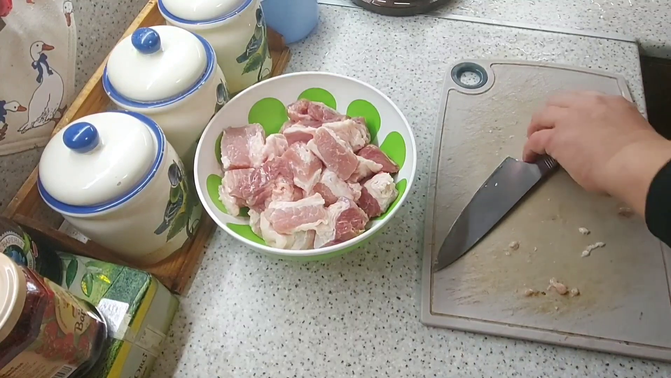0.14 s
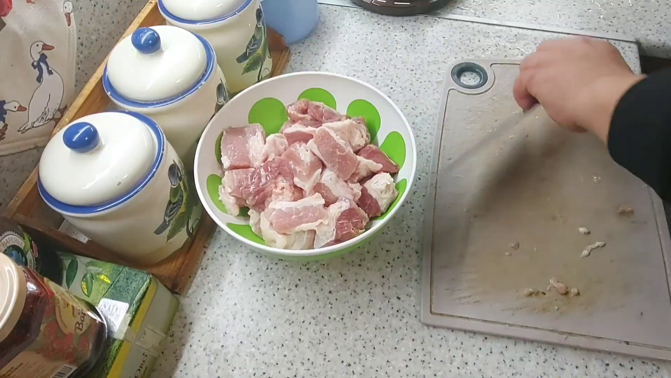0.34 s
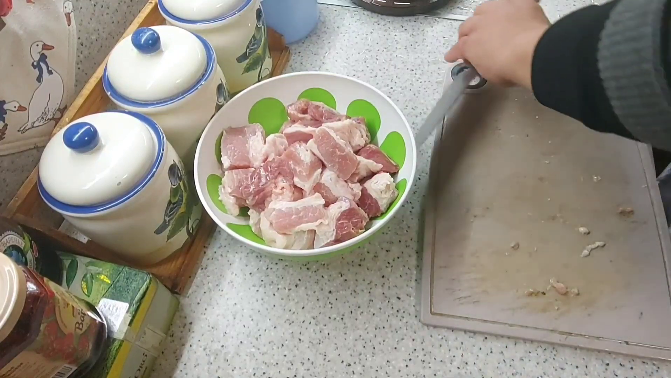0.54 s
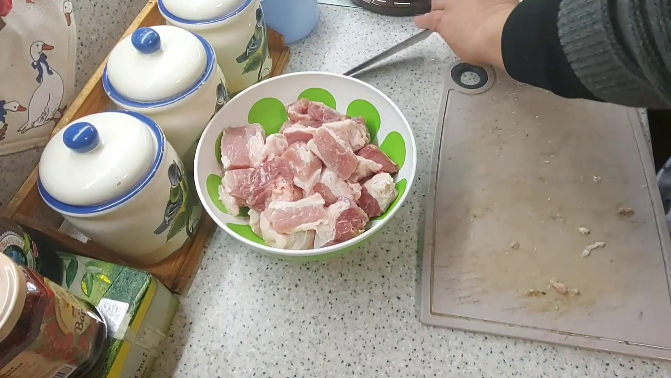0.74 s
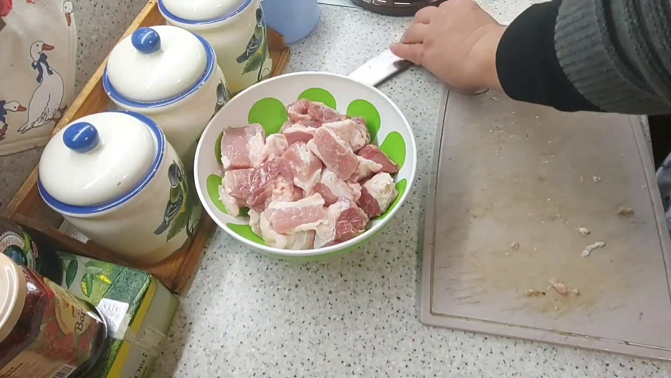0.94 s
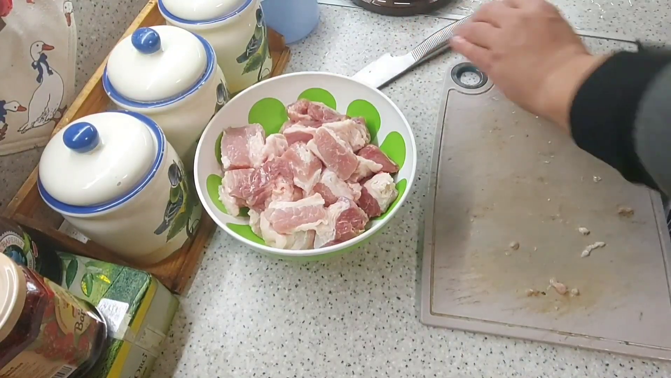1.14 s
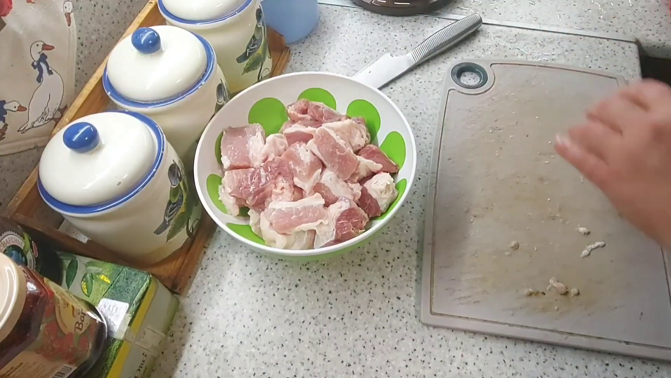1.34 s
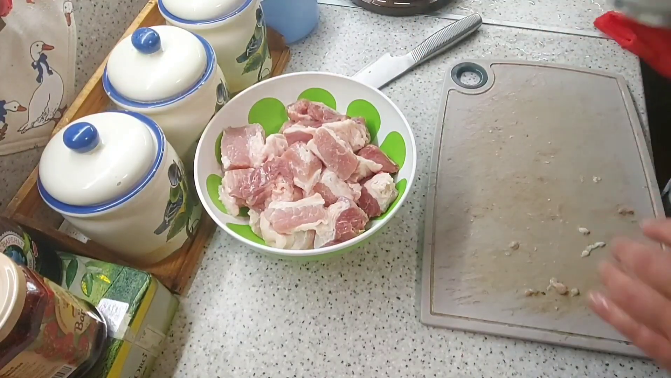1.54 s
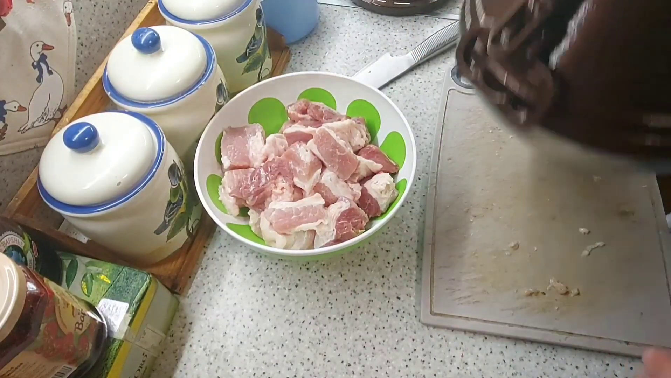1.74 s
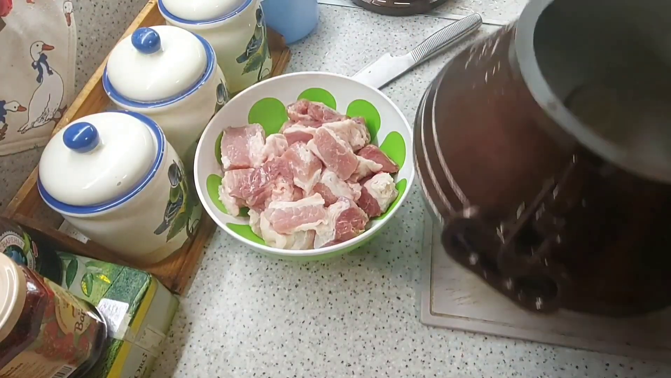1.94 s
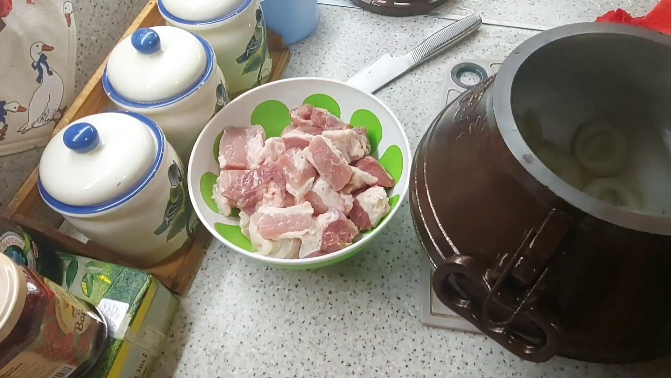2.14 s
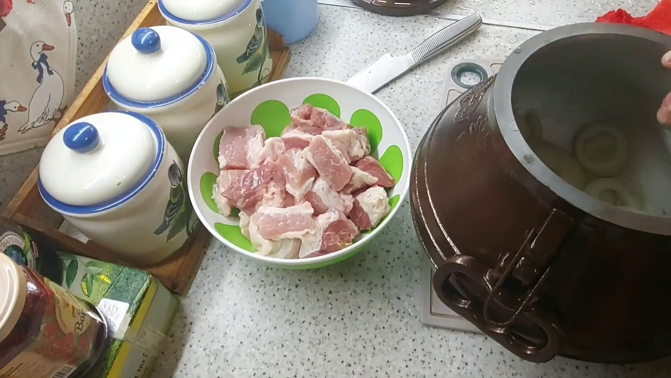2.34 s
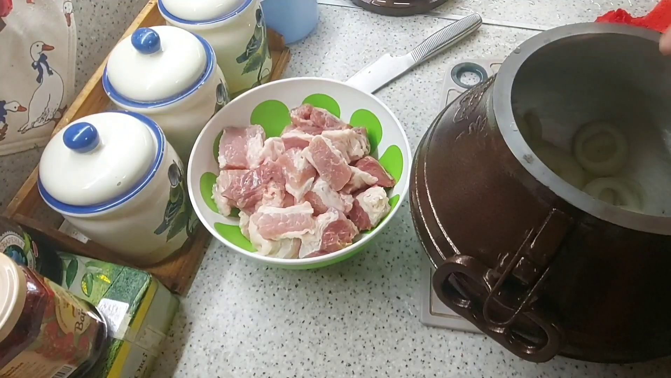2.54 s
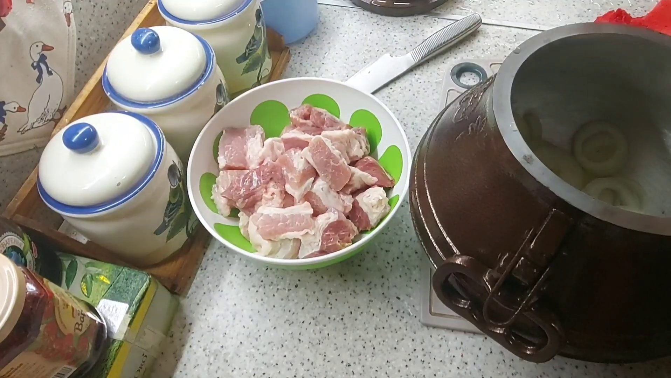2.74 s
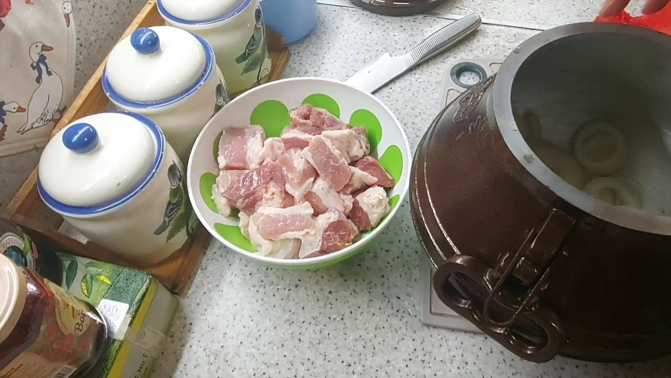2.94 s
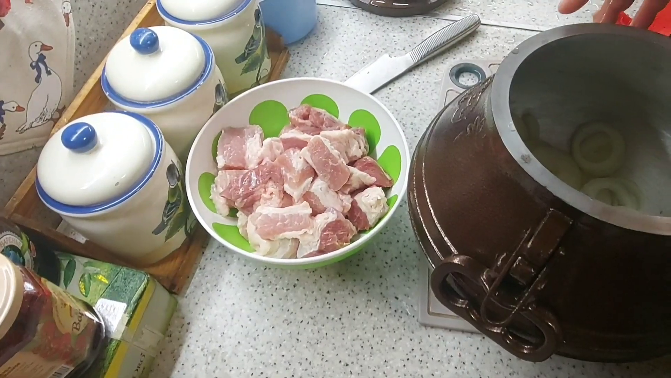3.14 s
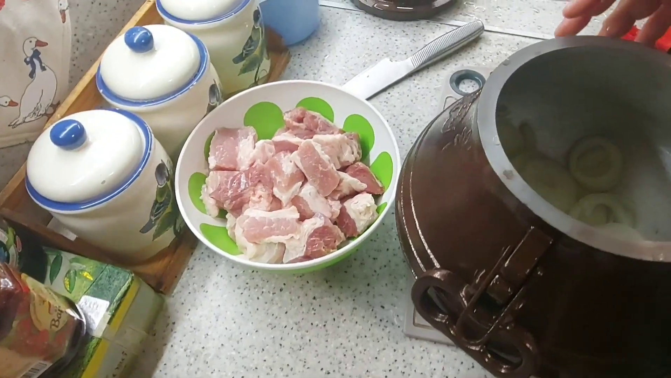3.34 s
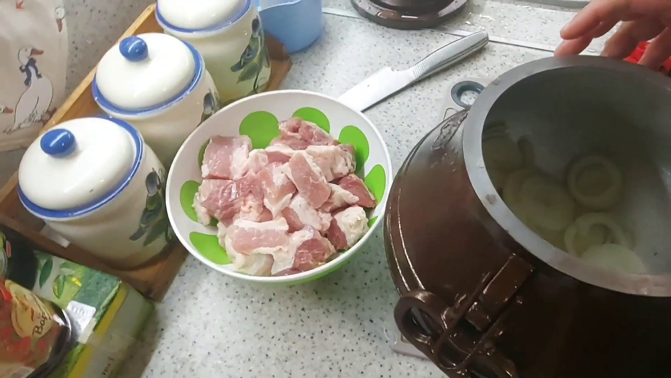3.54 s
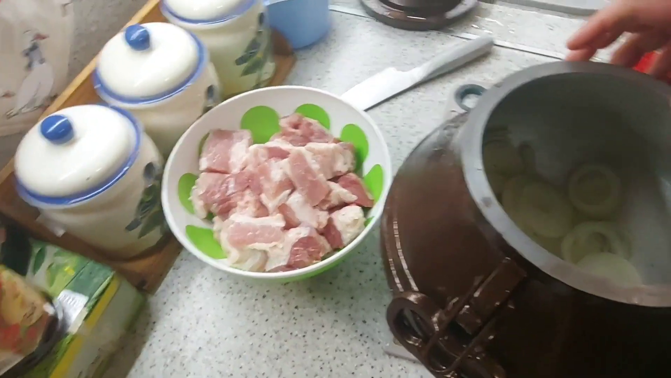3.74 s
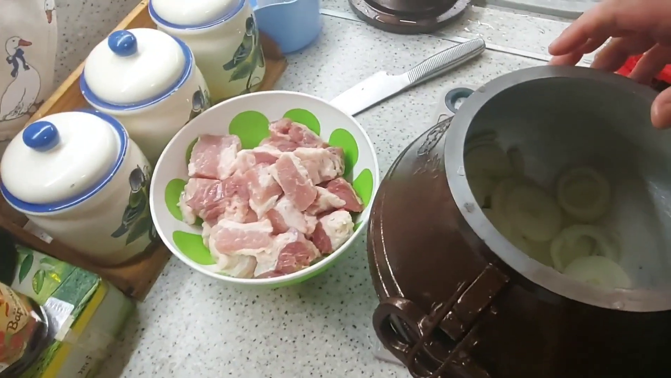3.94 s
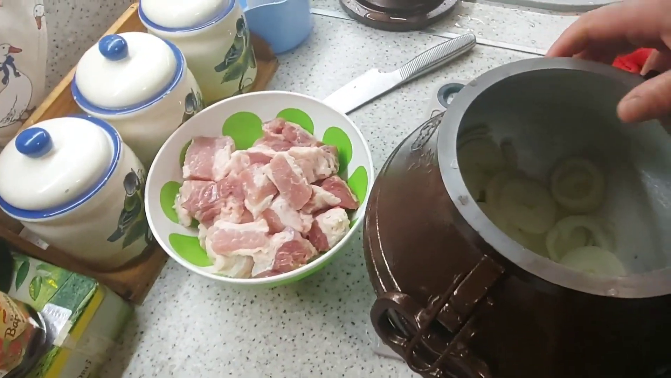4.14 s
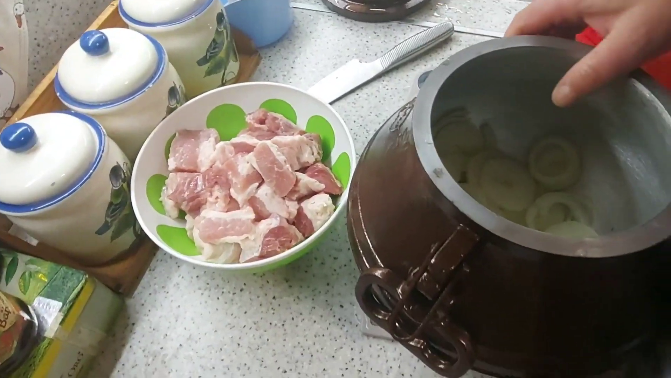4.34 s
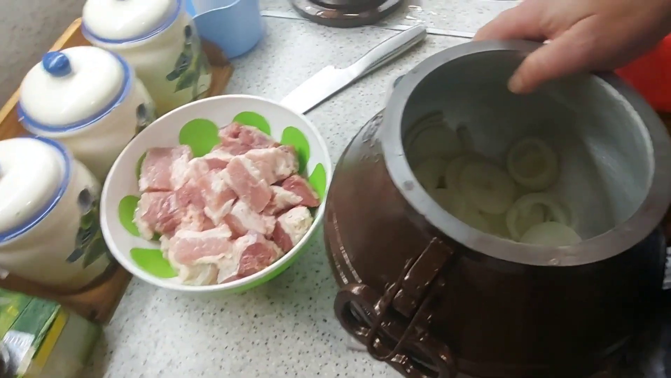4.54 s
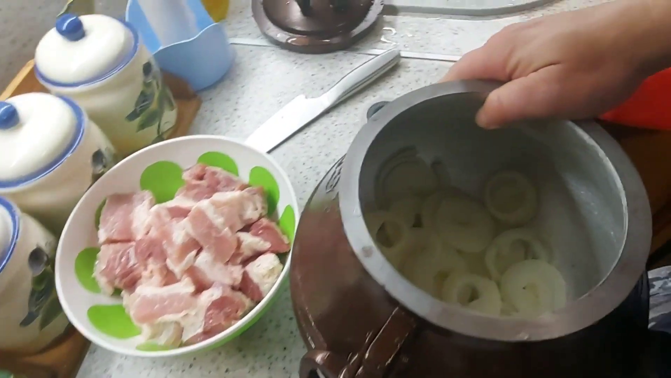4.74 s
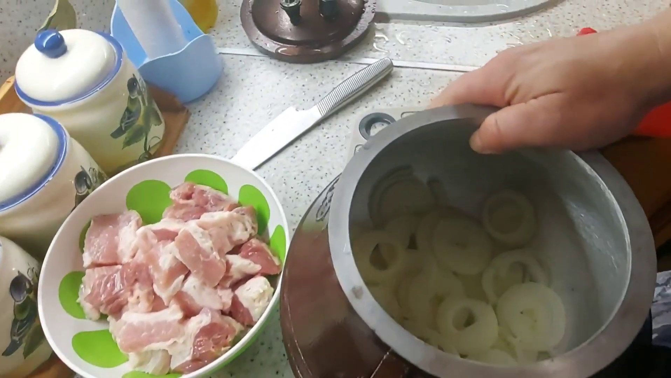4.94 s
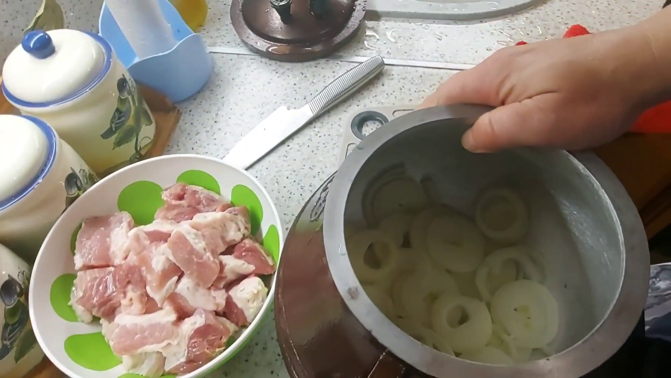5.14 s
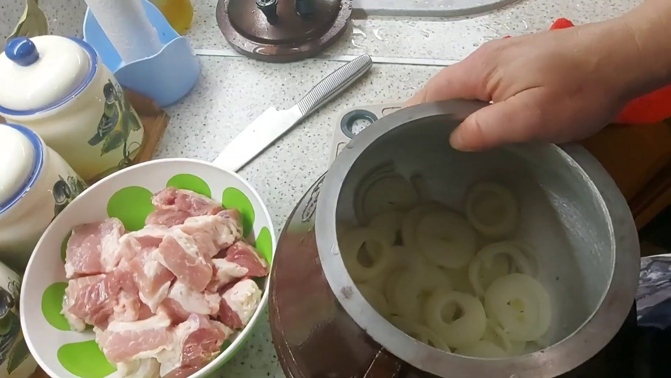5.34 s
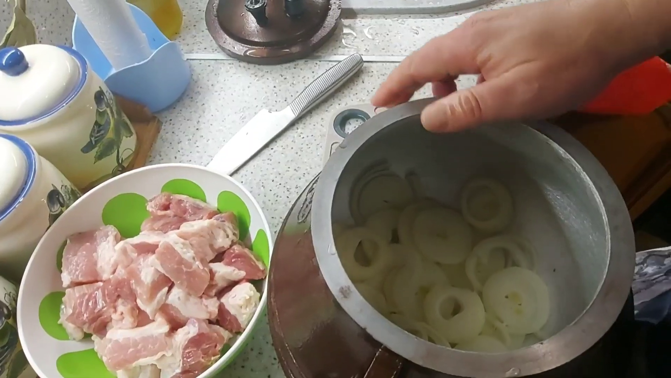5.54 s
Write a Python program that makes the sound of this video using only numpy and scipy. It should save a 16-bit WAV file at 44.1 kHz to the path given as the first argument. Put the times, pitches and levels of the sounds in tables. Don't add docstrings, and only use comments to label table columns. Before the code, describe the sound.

A knife clatters, scrapes and rings on a kitchen worktop, then a heavy pot thuds down, followed by latch clicks and light rim taps.

```python
import sys
import numpy as np
from scipy import signal
from scipy.fft import rfft, irfft
from scipy.io import wavfile
from scipy.ndimage import uniform_filter1d

SR = 44100
rng = np.random.default_rng(int(sys.argv[2]) if len(sys.argv) > 2 else 0)


def store_wav(level_fs):
    pcm = np.round(np.clip(np.atleast_2d(level_fs), -1, 1) * 32767)
    wavfile.write(sys.argv[1], SR, pcm.T.astype(np.int16))


def magnitude_from_level(level_db):
    exponent = np.asarray(level_db, float) / 20
    return 10 ** exponent


N = 250664
T = np.arange(N) / SR
KNIFE_METAL_DB = 21.5
STOP_S = 0.0052

# centre in Hz, width in Hz, level in dB.
BLADE_MODES = [(2260, 50, -15.5), (2575, 16, -18.5), (2640, 10, -19.5), (3236, 41, -8.5), (3435, 3.7, -13),
               (4580, 33, -9), (4805, 6, -7), (5280, 90, -12.5), (5704, 22, -7.5), (5983, 30, -12.5),
               (6290, 70, -10.5), (6780, 29, -10.5), (7450, 25, -10), (8700, 32, -7.5), (9200, 45, -11),
               (9980, 40, -11.5), (10340, 45, -11.5), (11470, 80, -11.5), (12060, 35, -11), (11440, 35, -7),
               (12030, 23, -11), (12860, 33, -8.5), (14060, 32, -15), (13570, 35, -12.5), (15450, 31, -13)]
WORKTOP_MODES = [(150, 32, -7.5), (241.2, 43, 3.5), (250, 27, -10.5), (377, 52, 1.5), (465, 5.8, 4.5),
                 (510, 4, -2.5), (612, 11, -18.5), (760, 15, -11.5), (850, 22, 3.5), (930, 16, -14),
                 (936, 23, -10), (1260, 88, -13.5), (1290, 51, -16)]
POT_MODES = [(156, 9.7, 16.5), (199.6, 17, 22), (271, 53, 3.5), (376, 70, 13.5), (349, 83, 15.5),
             (450, 58, 1), (449, 96, 18), (557, 110, 14.5), (693, 100, 12), (810, 63, 19), (920, 21, 12.5)]
LATCH_MODES = [(1750, 590, -9), (3100, 140, -7.5), (4307, 130, -1), (6445, 620, -0.5), (7500, 1100, -4),
               (9560, 280, -7), (10430, 220, -1), (12960, 230, -25.5), (14310, 250, -20)]


def unit(x):
    return x / np.sqrt(np.mean(x ** 2) + 1e-30)


def peak(x, db):
    return x * magnitude_from_level(db) / np.max(np.abs(x))


def decay(t, t60):
    return np.exp(-np.log(1000) * t / t60)


def band(x, lo_hz, hi_hz):
    sos = signal.butter(2, [lo_hz, min(hi_hz, .45 * SR)], "bandpass", fs=SR, output="sos")
    return signal.sosfilt(sos, x)


def walk(rate, n=N):
    k = int(SR / rate)
    held = np.repeat(rng.standard_normal(n // k + 1), k)
    return uniform_filter1d(uniform_filter1d(held, k), k)[:n]


def grit(n, scatter_db):
    grain = np.repeat(rng.exponential(size=n // 24 + 1), 24)[:n]
    return unit(rng.standard_normal(n) * magnitude_from_level(scatter_db * grain))


def ports(mid, diff, side):
    return mid + side * diff * np.array([[1], [-1]])


def add(out, x, s, pan_db):
    i = int(s * SR)
    pan = magnitude_from_level(np.array([[pan_db], [-pan_db]]) / 2)
    out[:, i:i + x.shape[-1]] += pan * x[..., :N - i]


def ring(x, modes, scatter_db, drift=0):
    luck = rng.standard_normal((len(modes), 2))
    out = 0
    for (hz, width, db), (spot, detune) in zip(modes, luck):
        r = np.exp(-np.pi * abs(width) / SR)
        turn = 2 * np.pi * hz * (1 + .0015 * detune) / SR
        share = walk(drift, x.shape[-1]) if drift else spot
        drive = x * magnitude_from_level(scatter_db * share)
        mode = signal.lfilter([1, 0, -1], [1, -2 * r * np.cos(turn), r * r], drive)
        out = out + magnitude_from_level(db) * (1 - r) * mode
    return out


def hits(table, body, metal, metal_db, scatter_db, blow, push_s, rise_s, split_hz, top_hz, pan_db):
    out, t = np.zeros((2, N)), T[:SR // 5]
    end = np.cos(np.pi / 2 * t / t[-1])
    for s, crack_db, knock_db, sizzle_db, t60 in table:
        fade = decay(t, max(t60, .005)) * np.minimum(t / rise_s, 1) ** 2
        scuff = ports(grit(len(t), 2.2), grit(len(t), 2.2), 1.0) * fade
        push = blow * np.sin(np.pi * np.minimum(t / push_s, 1))
        push = push + 0.39 * ports(scuff.mean(axis=0), scuff[0] - scuff[1], 0.1)
        bright = scuff + magnitude_from_level(metal_db) * ring(scuff, metal, scatter_db)
        lags = rng.integers(4, 30, size=2)
        bright += 0.41 * np.array([np.roll(b, k) for b, k in zip(bright, lags)])
        knock = band(ring(push, body, 3) + magnitude_from_level(-7.5) * push, 150, 1200)
        knock += ports(0, band(np.roll(knock[0], 40), 560, 1900), 0.85)
        crack = band(bright, 1100, split_hz)
        sizzle = band(band(bright, split_hz, top_hz), split_hz / 2, top_hz)
        start = s - rise_s / 2
        add(out, end * peak(knock, knock_db + 5.5), start, pan_db * 0.32)
        add(out, end * (peak(crack, crack_db + 7.0) + peak(sizzle, sizzle_db + 8)), start, pan_db)
    return out


def knife_knocks():
    # time in seconds, crack, knock and sizzle peaks in dB, scuff t60 in seconds.
    knocks = [(.4226, -36.5, -47, -31, 0.091), (.4983, -24.5, -31.5, -23.5, 0.15),
              (.5287, -28, -35, -27.5, 0.093), (.6991, -24, -19.5, -25.5, 0.077),
              (.7961, -23, -18, -23, 0.052), (.8223, -30.5, -22.5, -48, 0.091),
              (.8548, -27, -29, -30, 0.53), (.8719, -33, -22, -27.5, 0.13), (.8863, -25, -20, -35.5, 0.087),
              (.9006, -25.5, -28.5, -34.5, 0.23), (.9695, -21.5, -16, -30, 0.12),
              (.9959, -16, -13, -25, 0.031), (1.0500, -16, -16, -22.5, 0.055)]
    return hits(knocks, WORKTOP_MODES, BLADE_MODES, KNIFE_METAL_DB, scatter_db=-4.5, blow=0.3,
                push_s=0.00045, rise_s=0.0019, split_hz=5240, top_hz=17000, pan_db=2)


def knife_slips():
    # time in seconds, crack, knock and sizzle peaks in dB, scuff t60 in seconds.
    glances = [(.5095, -42, -37.5, -29, 0.044), (.5548, -24.5, -38, -27.5, 0.16),
               (.575, -26, -38, -32, 0.19), (.598, -34, -41, -36, 0.054), (.683, -38.5, -37.5, -36, 0.11),
               (.9847, -26.5, -19, -17, 0.3), (1.0039, -20, -35, -22.5, 0.056),
               (1.0579, -19.5, -12.5, -17.5, 0.081), (1.0664, -25.5, -49, -30, 0.022),
               (1.0964, -28.5, -19, -34, 0.1), (1.1144, -27, -24.5, -42, 0.27),
               (1.126, -34.5, -28, -42.5, 0.03), (1.1701, -26, -22, -38, 1),
               (1.21, -26, -25.5, -16.5, 0.07), (1.2506, -23, -20.5, -17, 0.16),
               (1.2895, -23, -28, -24, 0.04), (1.3238, -32, -38.5, -26.5, 0.051),
               (1.4103, -43.5, -52.5, -39.5, 0.098)]
    return hits(glances, WORKTOP_MODES, BLADE_MODES, KNIFE_METAL_DB, scatter_db=5.5, blow=0,
                push_s=1, rise_s=.009, split_hz=4020, top_hz=16100, pan_db=2.0)


def slide():
    # start and length in seconds, pressure in dB, sag over the stroke in dB, share of rumble in dB.
    strokes = [
        (0.43, 0.037, -40.5, -8.5, -11),
        (0.491, 0.18, -30.5, -24, -20),
        (0.708, 0.07, -41.5, -8, -13),
        (0.832, 0.11, -42, 6.5, 1.5),
        (0.998, 0.12, -24.5, -17, -2),
        (1.15, .3, -33.5, -9.5, 5.5),
    ]
    rise_s, lift_s = .02, .05
    first = strokes[0][0]
    t = T[int(first * SR):int(first * SR) + 6 * SR // 5]
    n = len(t)
    hiss = rumble = 0
    for s, length, db, sag_db, rumble_db in strokes:
        lift = np.clip(1 - (t - s - length) / lift_s, 0, 1) ** 2
        touch = np.clip((t - s) / rise_s, 0, 1) * lift
        pressure_db = db + sag_db * (t - s) / length
        hiss = hiss + touch * magnitude_from_level(pressure_db)
        rumble = rumble + touch * magnitude_from_level(pressure_db + rumble_db)
    fine = ports(grit(n, 0.81), grit(n, 1.5), 0.61) * magnitude_from_level(3.1 * walk(90, n))
    steel = fine + magnitude_from_level(KNIFE_METAL_DB) * ring(fine, BLADE_MODES, 6.0, drift=14)
    steel = unit(band(steel, 1500, 18000))
    slips = (rng.random(n) < 500 / SR) * magnitude_from_level(3.0 * rng.exponential(size=n))
    slips = slips + 0.0073 * fine
    laminate = unit(band(ring(slips, WORKTOP_MODES, 2.0, drift=12), 160, 800))
    out = np.zeros((2, N))
    add(out, steel * hiss + laminate * rumble, first, 1.5)
    return out


def nulls(x):
    # centre in Hz, width in Hz.
    notches = [(3250, 150), (3850, 130), (4250, 130), (5130, 160), (6180, 180), (6620, 160), (7050, 160),
               (7600, 330), (8150, 250), (9580, 350), (10800, 250), (12450, 300), (14700, 400)]
    n = int(1.7 * SR)
    knife = x[:, :n]
    for hz, width in notches:
        b, a = signal.iirpeak(hz, hz / width, SR)
        depth = np.clip(1.05 + .4 * walk(7, n), 0, 1)
        knife = knife - depth * signal.lfilter(b, a, knife)
    return np.hstack([knife, x[:, n:]])


def tilt(x, count=8):
    from_s, to_s, width_hz = 1.205, 1.315, 600
    a0, a1 = int((from_s - .05) * SR), int((to_s + .05) * SR)
    part = x[:, a0:a1]
    place = (T[a0:a1] - from_s) / (to_s - from_s) * count
    for k, hz in enumerate(np.linspace(3750, 4550, count + 1)):
        depth = np.clip(2 - np.abs(place - k), 0, 1)
        part = part - depth * signal.lfilter(*signal.iirpeak(hz, hz / width_hz, SR), part)
    return np.hstack([x[:, :a0], part, x[:, a1:]])


def taps():
    # time in seconds, pitch in Hz, peak in dB, t60 in seconds.
    blows = [
        (.9678, 730, -5, .028),
        (.9678, 1450, -15, .015),
        (1.0483, 520, -9, .03),
        (.9925, 520, -14, .03),
        (.5043, 300, -30, .06),
        (2.81, 420, -41, .05),
        (2.829, 330, -36, .09),
        (3.2545, 1500, -43, .02),
        (5.022, 345, -33, .08),
        (5.022, 1550, -45, .04),
    ]
    out, t = np.zeros((2, N)), T[:SR // 5]
    for s, hz, db, t60 in blows:
        add(out, -magnitude_from_level(db) * np.sin(2 * np.pi * hz * t) * decay(t, max(t60, .005)), s, 2.5)
    return out


def bounces():
    # time in seconds, peak in dB.
    contacts = [
        (0.424, -36),
        (0.498, -30.5),
        (.529, -26),
        (.553, -30.5),
        (0.572, -33.5),
    ]
    # pitch in Hz, level in dB.
    board = [(1030, 0.5), (1560, -2), (2200, -23), (2850, -7)]
    out, t = np.zeros((2, N)), T[:SR // 10]
    fade = np.minimum(t / 0.0019, 1) * decay(t, 0.052)
    for s, db in contacts:
        tone = 0
        for hz, mode_db in board:
            level = magnitude_from_level(mode_db + 2 * rng.standard_normal())
            tone = tone + level * np.sin(2 * np.pi * hz * t + rng.random((2, 1)))
        add(out, magnitude_from_level(db) * tone * fade, s, 2.5)
    return out


def notes():
    # time in seconds, pitch in Hz, peak in dB, t60 and free time in s.
    held_notes = [(0.44, 2650, -50.5, 1.7, .058), (.435, 850, -48.5, 0.83, 0.065),
                  (.53, 6378, -37, 0.15, 0.022), (.53, 4500, -36, 0.44, 0.05), (.53, 3750, -27, 0.08, .02),
                  (0.61, 4820, -47.5, 0.32, .08), (0.61, 6710, -52.5, 0.5, .08),
                  (.62, 760, -50.5, 0.8, .07), (.62, 1375, -49, .6, 0.089),
                  (0.698, 11250, -39.5, 0.41, 0.082), (.705, 2720, -49, 1.8, .09),
                  (.70, 2540, -40.5, .5, 0.1), (.80, 2640, -39, 0.82, .08), (.82, 3435, -38, .6, .065),
                  (.80, 12030, -37.5, .2, .08), (0.889, 1399, -30.5, 2.5, 0.087),
                  (.885, 1684, -33, 0.4, .07), (.89, 2710, -38.5, .4, 0.068),
                  (.89, 2890, -33.5, 0.18, 0.045), (0.996, 5704, -18.5, 0.28, 0.044),
                  (0.996, 3435, -19, 0.12, 0.03), (.996, 5870, -28, 0.36, 0.048),
                  (1.0, 5983, -34.5, .5, .1), (1.0, 9900, -31, 0.27, 0.068), (1.03, 6950, -41.5, .5, .06),
                  (1.055, 11710, -32, 0.25, 0.21), (1.055, 11900, -36, .25, .06),
                  (1.069, 4805, -37.5, 0.5, .047), (1.21, 8700, -34.5, 0.4, 0.061),
                  (1.24, 4730, -33, .4, 0.049), (1.215, 5550, -32, .4, 0.047),
                  (1.235, 6797, -44, 0.45, 0.041), (1.24, 12030, -48, .3, .06),
                  (1.31, 11930, -38.5, 0.36, .08), (1.35, 4760, -43.5, 0.75, 0.13),
                  (1.697, 916, -61.5, 0.34, 0.079), (1.77, 1398, -70, 1.0, .06),
                  (2.068, 1990, -48, 0.33, .035), (4.22, 1990, -50, 0.36, 0.048)]
    # time in seconds, pitch in Hz, peak in dB, t60 in seconds.
    pings = [(0.422, 2720, -46, .04), (.531, 5190, -34, 0.038), (.557, 2210, -37, 0.055),
             (.699, 2340, -29.5, 0.026), (.7965, 2180, -22.5, 0.021), (.823, 1380, -32, 0.089),
             (0.97, 1266, -15.5, 0.055), (.9685, 2020, -20, 0.013), (0.995, 2930, -20, 0.034),
             (1.05, 1070, -28, .1), (1.191, 5730, -44, .07), (1.697, 1900, -64.5, 0.061),
             (1.822, 896, -66, .1), (1.9894, 3050, -36, 0.029), (2.115, 3120, -44, 0.04),
             (2.826, 827, -43, 0.06), (3.552, 10420, -24.5, .03), (4.219, 3880, -59, 0.2),
             (4.219, 4700, -51, 0.072), (4.217, 5950, -44.5, 0.084), (4.219, 3050, -46.5, 0.083),
             (4.40, 2070, -47, .04), (4.406, 5950, -32, 0.038), (4.407, 4280, -31.5, 0.033),
             (4.415, 3765, -40, 0.052), (1.993, 295.5, -38, 0.34), (2.023, 411, -34, 0.16),
             (2.149, 170, -23, 0.05), (4.084, 12600, -53.5, 0.017), (4.086, 11300, -61, .02),
             (0.9712, 467, -13.5, 0.055), (.70, 699, -27, 0.04), (5.031, 249, -39, 0.15),
             (2.024, 798, -34, 0.053), (3.545, 957, -24, 0.05), (5.024, 592, -36.5, 0.11),
             (1.112, 477, -15.5, 0.063), (.508, 258.3, -37, 0.25), (4.566, 1700, -40, .03),
             (4.766, 3050, -42.5, 0.046), (4.767, 3630, -47, 0.05)]
    out, t = np.zeros((2, N)), T[:SR // 4]
    rows = list(held_notes) + [(*ping, 1) for ping in pings]
    for (s, hz, db, t60, free), (step, wobble) in zip(rows, rng.random((len(rows), 2))):
        stopped = np.exp(-np.maximum(t - free, 0) / STOP_S)
        fade = decay(t, max(t60, .02)) * stopped * np.minimum(t / 0.00062, 1)
        phase = 1.1 * min(hz / 900, 1) * step * np.array([[1], [-1]])
        waver = 1 + 0.23 * np.sin(2 * np.pi * (30 + 40 * wobble) * t)
        add(out, magnitude_from_level(db) * fade * np.sin(2 * np.pi * hz * t + phase) * waver, s, 2.0)
    return out


def thumps():
    # time in seconds, peak in dB, free time in seconds.
    booms = [(0.425, -46.5, 0.065), (0.499, -42.5, 0.052), (0.556, -40, .2), (0.699, -42, 0.12),
             (0.788, -39, 0.22), (0.966, -22, .1), (1.047, -23, .15), (2.02, -15.5, 0.14),
             (2.148, -17, 0.045), (2.261, -42, 0.052), (2.821, -46, 0.11), (3.251, -50, 0.11),
             (3.537, -38.5, 0.12), (3.666, -39.5, 0.084), (4.11, -47, .15)]
    # pitch in Hz, level in dB.
    cabinet = [(78, 0), (92, -10.5), (130, -6.5), (195, 3.5)]
    out, t = np.zeros((2, N)), T[:SR // 2]
    lag = 0.2 * np.array([[1], [-1]])
    for s, db, free in booms:
        t60 = max(0.24 * np.exp(-0.0074 * (db + 48)), .03)
        boom = 0
        for hz, mode_db in cabinet:
            fade = decay(t * (hz / 78) ** 1.3, t60)
            boom = boom + magnitude_from_level(mode_db) * np.sin(2 * np.pi * hz * t + lag) * fade
        held = .25 + .75 * np.exp(-np.maximum(t - free, 0) / STOP_S)
        swell = 1 - np.exp(-t / 0.015)
        add(out, peak(band(boom * held * swell, 55, 380), db), s, 1.5)
    return out


def rocking():
    from_s, to_s, ticks_per_s = 2.209, 2.784, 23.35
    level_db, hz = -52, 2300
    out, t = np.zeros((2, N)), T[:SR // 20]
    for s in np.arange(from_s, to_s, 1 / ticks_per_s):
        scuff = rng.standard_normal((2, len(t))) * np.exp(-((t - .012) / .011) ** 2)
        tick = band(scuff, hz * 0.86, hz * 1.16) + magnitude_from_level(-14.5) * band(scuff, 5000, 17000)
        add(out, peak(tick, level_db + 0.65 * rng.standard_normal()), s, 0)
    return out


def latch():
    # time in seconds, crack, knock and sizzle peaks in dB, scuff t60 in seconds.
    clicks = [(1.9886, -31, -41.5, -35.5, 0.08), (2.0207, -37, -28, -47, 0.094),
              (2.1485, -47, -45, -51, 0.042), (2.7967, -42.5, -51, -40, 0.18),
              (2.8229, -37.5, -35, -32, 0.076), (3.1249, -54, -81, -51.5, .074),
              (3.2334, -45, -56, -42, 0.048), (3.2545, -34, -40, -42.5, 0.039),
              (3.5439, -27, -20, -23.5, 0.1), (3.5516, -23.5, -26.5, -20.5, 0.019),
              (3.5604, -47, -31.5, -44.5, 0.053), (3.6708, -33.5, -24.5, -35, 0.037),
              (4.0842, -68, -82, -65, 0.022), (5.0225, -41, -41, -36.5, 0.013),
              (5.0341, -52.5, -38, -60, 0.018), (5.4808, -45, -48, -37, 0.021)]
    return hits(clicks, POT_MODES, LATCH_MODES, metal_db=-1.5, scatter_db=-4.0, blow=0.16,
                push_s=0.0014, rise_s=0.0028, split_hz=4880, top_hz=16000, pan_db=-0.5)


def brushes():
    # time in seconds, crack, knock and sizzle peaks in dB, scuff t60 in seconds.
    scuffs = [
        (.186, -50, -63, -58.5, 0.044),
        (2.0694, -41, -42.5, -47, 0.099),
        (2.105, -47, -46, -55.5, 0.078),
        (3.17, -53, -80, -65, 0.072),
        (3.71, -46, -51, -59.5, 0.062),
        (2.6583, -46.5, -65, -48, 0.2),
        (3.184, -46.5, -52, -53.5, .034),
        (3.5366, -27.5, -32.5, -36, 0.12),
        (3.658, -47.5, -38, -47, 0.16),
        (5.4714, -53.5, -59, -50, 0.27),
    ]
    return hits(scuffs, POT_MODES, LATCH_MODES, metal_db=12, scatter_db=3.5, blow=0,
                push_s=1, rise_s=0.0085, split_hz=5350, top_hz=16700, pan_db=0.5)


def rim_taps():
    # time in seconds, crack, knock and sizzle peaks in dB, scuff t60 in seconds.
    touches = [
        (4.1848, -49, -53, -83, 0.055),
        (4.2175, -40, -43.5, -36.5, 0.074),
        (4.382, -41.5, -48, -62, 0.07),
        (4.3972, -42, -44, -56, 0.2),
        (4.4056, -32.5, -42.5, -27.5, 0.04),
        (4.564, -38.5, -54, -51, 0.048),
        (4.7668, -48, -50.5, -49, 0.066),
        (5.4, -59, -62, -55.5, 0.12),
    ]
    # centre in Hz, width in Hz, level in dB.
    rim_modes = [(1550, 85, -1), (2013, 210, 13.5), (3050, 180, 13.5), (3815, 180, 19), (4190, 300, 7.5),
                 (4700, 250, 7.5), (5300, 180, -4), (5950, 170, 0), (6600, 165, -18), (8000, 350, -10)]
    return hits(touches, POT_MODES, rim_modes, metal_db=-0.5, scatter_db=-1.0, blow=0.066,
                push_s=0.00095, rise_s=0.003, split_hz=2470, top_hz=8410, pan_db=1.5)


def fingers():
    # time in seconds, crack, knock and sizzle peaks in dB, scuff t60 in seconds.
    grasps = [
        (3.176, -49, -68, -57.5, 0.051),
        (3.19, -51, -54, -52.5, 0.036),
        (3.515, -48, -57, -60, 0.1),
        (3.528, -44, -42, -52.5, .1),
    ]
    return hits(grasps, POT_MODES, LATCH_MODES, metal_db=3, scatter_db=1.0, blow=0,
                push_s=1, rise_s=0.0055, split_hz=3400, top_hz=12020, pan_db=2.0)


def rub():
    from_s, to_s = 3.385, 3.54
    n = int((to_s - from_s) * SR)
    friction = unit(band(ports(grit(n, 2.2), grit(n, 2.2), 0.77), 900, 1130))
    level_db = -57.5 + 3.4 * np.cos(2 * np.pi * np.arange(n) / n)
    out = np.zeros((2, N))
    add(out, magnitude_from_level(level_db) * friction, from_s, 0)
    return out


def movements(table):
    lower = upper = 0
    for s, rise, fall, db, tilt_db in table:
        away = np.maximum((s - T) / rise, (T - s) / fall)
        gain = magnitude_from_level(db - 20 * away ** 1.84)
        lower, upper = lower + gain, upper + gain * magnitude_from_level(tilt_db)
    return lower, upper


def rustle():
    # peak, rise and fall in seconds, level in dB, tilt from lower to upper range in dB.
    sleeve = [
        (0.0, .1, 0.29, -67.5, -4),
        (1.801, 0.52, 0.89, -77.5, -1),
        (2.03, 0.041, 0.35, -53.5, -9.5),
        (2.681, 0.24, 0.79, -66, -1),
        (3.221, 0.095, 0.39, -64, -8),
        (3.58, 0.27, 0.4, -62, -5.5),
        (4.22, 0.088, 0.26, -64.5, -8.5),
        (4.74, 0.58, 0.46, -65.5, -4.5),
    ]
    grip = [
        (.18, 0.047, 0.081, -61.5, 3.5),
        (2.199, 0.19, 0.091, -47, -23),
        (2.8, 0.066, 0.6, -70, -24.5),
        (3.22, 0.065, 0.14, -53, -20),
        (3.42, 0.18, 0.1, -67, 7),
        (3.689, 0.3, 0.12, -54, -2),
        (3.819, 0.13, 0.093, -62.5, 1),
        (4.3, 0.39, 0.59, -63.5, -4.5),
        (4.749, 0.21, 0.24, -57, -1),
        (4.9, 0.22, 0.71, -61.5, -13),
    ]
    # pitch in Hz, level in dB per Hz.
    room = [(15, -40), (25, -12), (60, -0.5), (232, -10.5), (339, -10), (389, -16), (538, -17.5),
            (726, -31.5), (1730, -38.5), (1930, -36), (2400, -42.5), (3230, -41), (12600, -37),
            (15200, -42), (16500, -60)]
    still = (-71.5, -72.5, -81, -79.5)
    ranges = [(91, 300, .25), (310, 810, .5), (930, 4480, 1.0), (5557, 53000, 1.0)]  # Hz, Hz, width
    room_hz, room_db = np.transpose(room)
    f = np.fft.rfftfreq(N, 1 / SR) + 1
    colour = magnitude_from_level(np.interp(np.log(f), np.log(room_hz), room_db))
    stirs = movements(grip) + movements(sleeve)
    out = 0
    for still_db, stir, (lo_hz, hi_hz, side) in zip(still, stirs, ranges):
        mid, diff = (unit(band(irfft(rfft(grit(N, 0.31)) * colour, N), lo_hz, hi_hz)) for _ in range(2))
        flicker = magnitude_from_level(3.0 + 1.8 * walk(10))
        out = out + np.hypot(magnitude_from_level(still_db), stir) * flicker * ports(mid, diff, side)
    return out


def fridge():
    # time in seconds, level in dB.
    hum = [(0.0, -58), (.9, -57), (1.5, -62.5), (1.9, -62), (2.3, -60), (2.8, -56), (3.09, -59.5),
           (3.3, -54), (3.71, -56), (4.03, -57), (4.25, -55.5), (4.8, -53), (5.11, -55.5), (5.68, -56)]
    # pitch in Hz, level in dB.
    overtones = [(98, -18), (150, -23), (296, -13.5), (597, -28), (1916, -32)]
    place_db = np.interp(T, *np.transpose(hum))
    whine_db = -60 + 1.1 * (place_db - place_db.mean())
    lag = np.array([[-1], [1]])
    motor = np.sin(2 * np.pi * 48.6 * T + 0.35 * walk(6.1) + 0.15 * lag)
    for hz, db in overtones:
        motor = motor + magnitude_from_level(db) * np.sin(2 * np.pi * hz * T + walk(8.7))
    whine = np.sin(2 * np.pi * 344.2 * T + 0.24 * walk(1.7) + 0.35 * lag)
    return np.sqrt(2) * (motor * magnitude_from_level(place_db) + whine * magnitude_from_level(whine_db + 1.5 + walk(13.0)))


def kitchen(x, t60, wet_db):
    t = T[:SR // 2]
    tail = rng.standard_normal((2, len(t))) * decay(t, t60) * (t > .0015)
    tail = band(tail / np.sqrt(np.sum(tail ** 2, axis=1, keepdims=True)), 500, 16000)
    return x + magnitude_from_level(wet_db) * signal.fftconvolve(x.mean(axis=0)[None], tail, axes=1)[:, :N]


def scene():
    knife = tilt(nulls(knife_knocks() + knife_slips() + slide()))
    near = knife + taps() + bounces() + notes()
    near = near + rocking() + latch() + brushes() + rim_taps()
    return kitchen(near, 0.16, -4.0) + thumps() + fingers() + rub() + rustle() + fridge()


def top_cut(x):
    return signal.sosfilt(signal.butter(12, 16520, fs=SR, output="sos"), x)


def record(dry):
    low_pass = signal.ellip(8, .2, 80, 16000, fs=SR, output="sos")
    return top_cut(signal.sosfilt(low_pass, dry))


dry = scene()
out = record(dry)
store_wav(out)
```